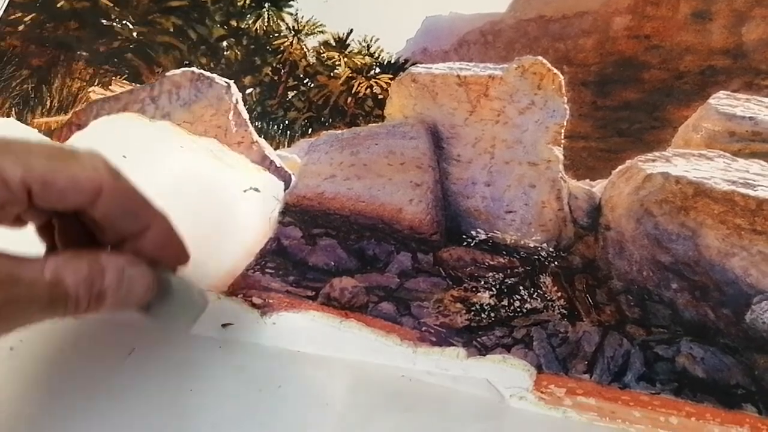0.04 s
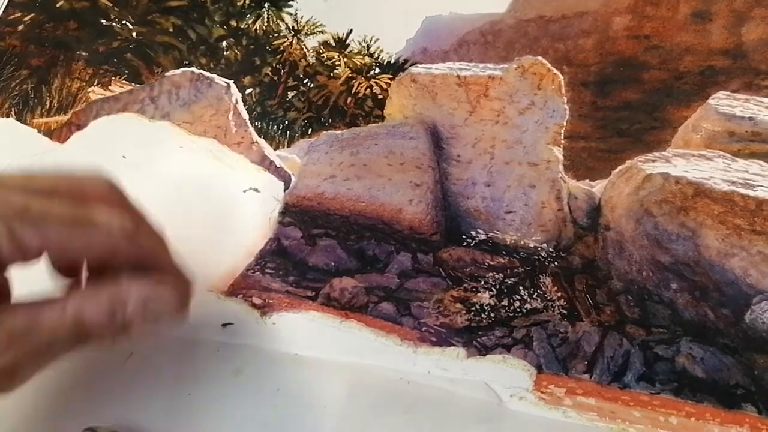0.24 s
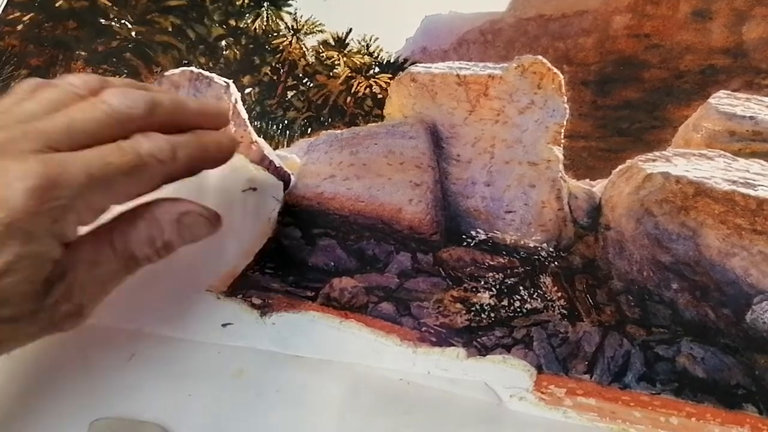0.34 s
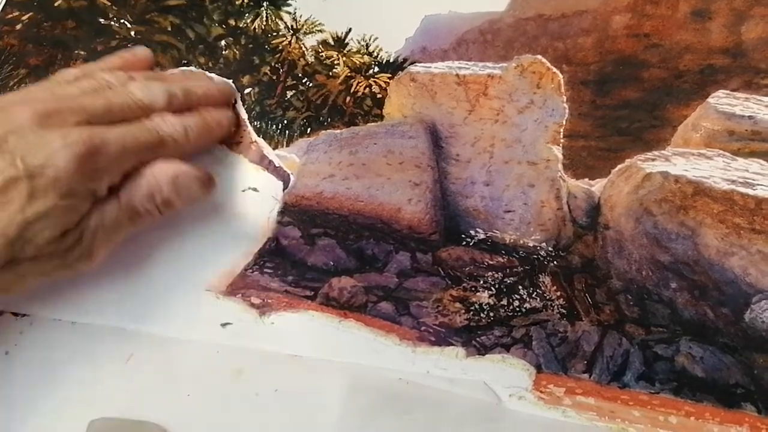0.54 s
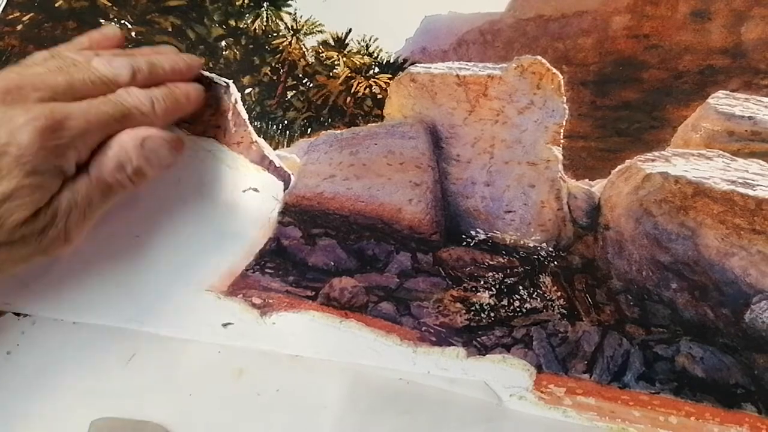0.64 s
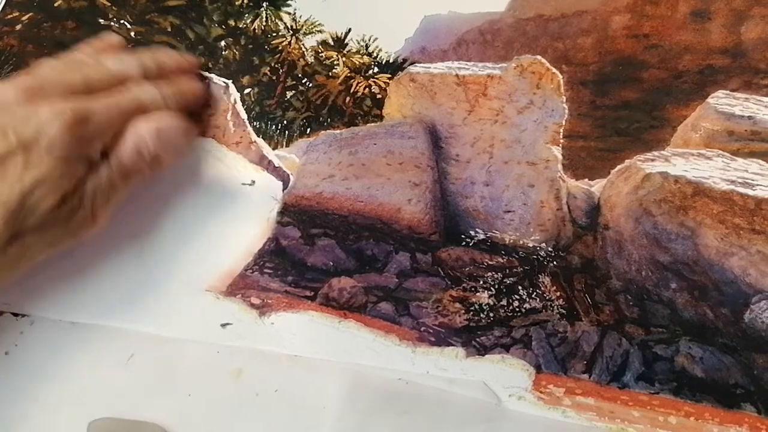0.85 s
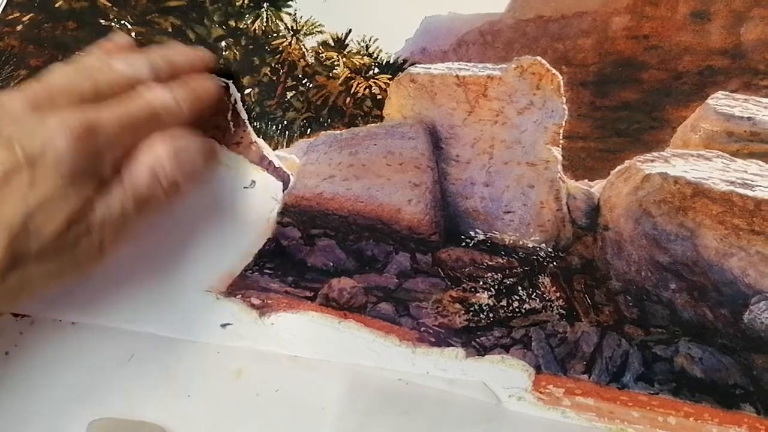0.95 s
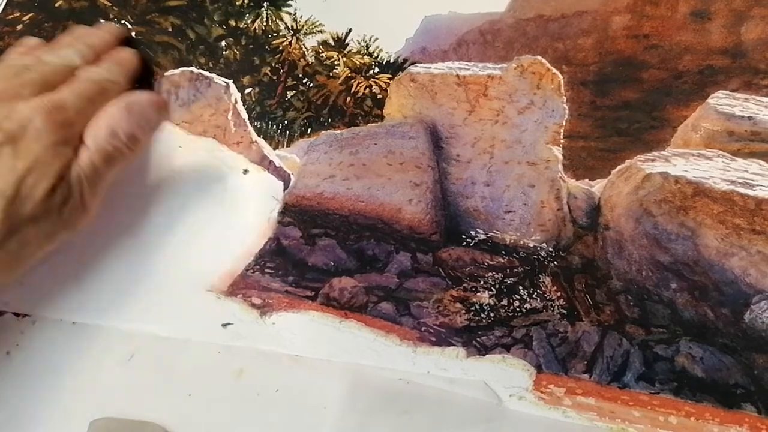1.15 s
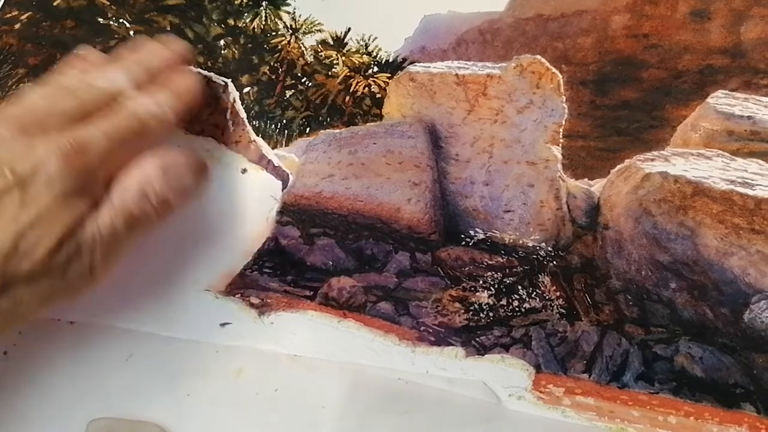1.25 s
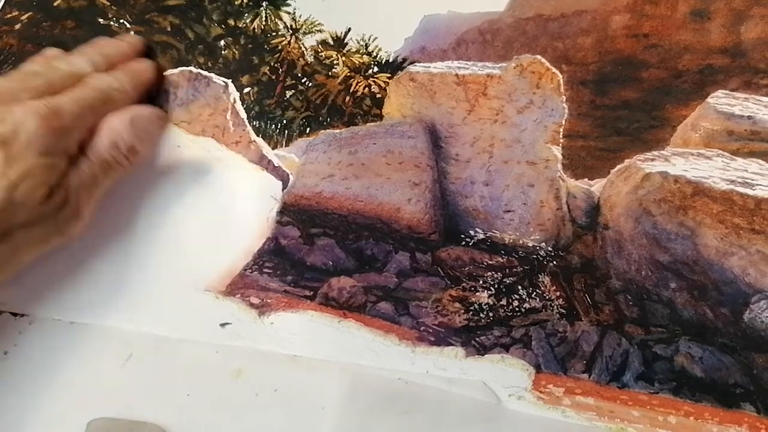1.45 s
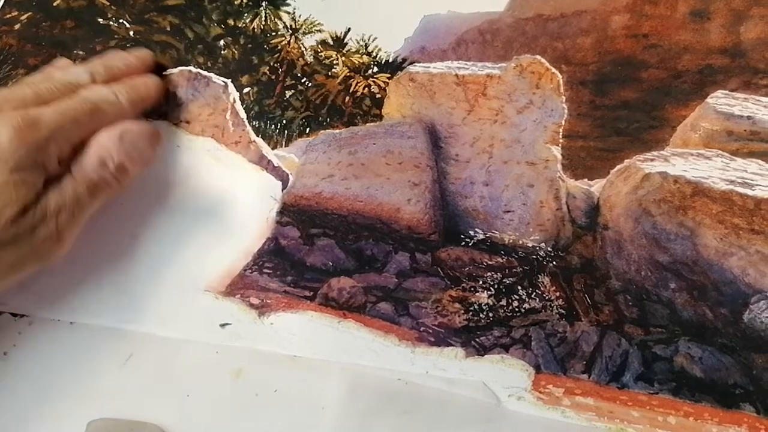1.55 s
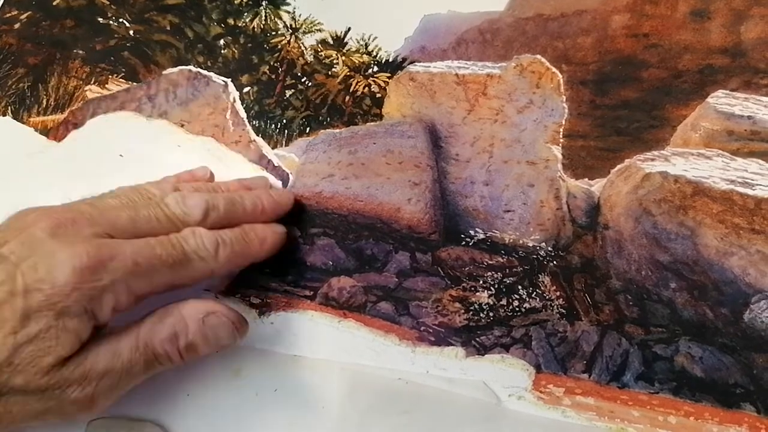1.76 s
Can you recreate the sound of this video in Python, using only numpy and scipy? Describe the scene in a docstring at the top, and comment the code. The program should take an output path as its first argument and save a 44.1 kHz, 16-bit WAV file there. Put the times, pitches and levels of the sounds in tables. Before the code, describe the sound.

Hand sweeping eraser crumbs off watercolour paper in four dry, airy strokes after an eraser clacks down

```python
"""The side of a hand sweeps crumbs off watercolour paper in four strokes, among lighter touches: dense
streams of tiny slips, coloured by the paper, with a hollow resonance under the hand. Before that an eraser
is set down on a drawing board: noise-burst knocks and clicks, ringing board modes, a scuff of filtered slips.
A sleeve rustles late, air stirs at the ports. A small quiet room, heard close up by two microphone ports."""
import sys
import numpy as np
from scipy import signal
from scipy.fft import rfft, irfft
from scipy.io import wavfile

SR = 44100
rng = np.random.default_rng(int(sys.argv[2]) if len(sys.argv) > 2 else 0)


def generate_wav(signal):
    """Clip the signal to [-1, 1] and save it as 16-bit WAV at the path in sys.argv[1]."""
    frames = np.transpose(np.atleast_2d(signal))
    scaled = np.clip(frames, -1, 1) * 32767
    pcm = np.round(scaled).astype(np.int16)
    wavfile.write(sys.argv[1], SR, pcm)


N = 79380

# knocks of the eraser on the board: (time [s], level [dB], thump re level [dB], click re level [dB])
KNOCK_EVENTS = [(0.2364, -0.5, 0.5, -17), (.2425, -6, -30, -21), (.2480, -6.5, -23, -1),
                (0.2935, -27, 11, -12), (0.3078, -10, 0.5, -5), (.3292, -21, -16, 6.5),
                (0.3398, -14.5, -25, -26), (0.3477, -9.5, 2, 8), (.3810, -21.5, -4, -10),
                (0.3856, -23, 3.5, 7), (0.463, -21.5, 8, -8)]
# spectrum of the eraser's edge clicking: (frequency [Hz], relative level [dB])
CLICK_SPECTRUM = [(300, -18), (550, -3), (760, 8.5), (1000, -4), (1500, -20), (3800, -8), (5400, 5.5),
                  (6800, -9), (9500, -14.5), (12000, -27), (15000, -38)]
PORT_LAG_S, EARLY_DB = 0.00013, 3


def undb(db):
    """Decibels to gain."""
    return 10 ** (np.asarray(db) / 20)


def clock():
    """Time of every sample [s]."""
    return np.arange(N) / SR


def unit(x):
    """Scale to rms 1."""
    return x / np.sqrt(np.mean(x ** 2))


def noise():
    """White noise over the whole scene."""
    return rng.standard_normal(N)


def impulse(start_s):
    """Single-sample push."""
    return 1. * (np.arange(N) == int(start_s * SR))


def fade(start_s, t60_s):
    """Exponential decay from start_s, zero before."""
    age_s = clock() - start_s
    return (age_s >= 0) * np.exp(-np.log(1000) * np.maximum(age_s, 0) / t60_s)


def burst(start_s, t60_s):
    """Decaying noise of unit energy."""
    x = noise() * fade(start_s, t60_s)
    return x / np.linalg.norm(x)


def ring(start_s, hz, t60_s):
    """One struck mode: a decaying sine."""
    return np.sin(2 * np.pi * hz * (clock() - start_s)) * fade(start_s, t60_s)


def curve(points):
    """Gain over time from (time [s], level [dB], ..) points, silent before the first."""
    s, db = np.array(points).T[:2]
    return undb(np.interp(clock(), s, db)) * (clock() >= s[0])


def gains(points, size):
    """Gain at each FFT bin, interpolated over log frequency from (frequency [Hz], level [dB]) points."""
    hz, db = np.array(points, float).T
    bin_hz = np.arange(size // 2 + 1) * SR / size
    return undb(np.interp(np.log(bin_hz + 1), np.log(hz), db))


def colour(x, points):
    """Minimum-phase filter of unit energy with the given spectrum."""
    size = 4096
    cepstrum = irfft(np.log(gains(points, size)))
    cepstrum[1:size // 2] *= 2  # fold the cepstrum to make the filter causal
    cepstrum[size // 2 + 1:] = 0
    h = irfft(np.exp(rfft(cepstrum)))
    return signal.fftconvolve(x, h / np.linalg.norm(h))[:N]


def lowpass(x, hz, order=2):
    """Butterworth low-pass."""
    return signal.sosfilt(signal.butter(order, min(hz, SR / 2 - 1), fs=SR, output="sos"), x)


def resonance(x, centre_hz, width_hz):
    """Band-pass with a movable centre, rms 1: shift down, low-pass, shift back."""
    carrier = np.exp(2j * np.pi * np.cumsum(centre_hz) / SR)
    baseband = lowpass(x / carrier, width_hz / 2)
    return unit((baseband * carrier).real)


def slips():
    """Tiny slips over the paper's tooth: random signed impulses, uneven in size, slightly wavering, rms 1."""
    slips_per_s, spread_db, waver_db, waver_hz = 30000, 5, -0.3, 119
    hit = rng.random(N) < slips_per_s / SR
    size = undb(spread_db * noise()) * np.sign(noise())
    waver = undb(waver_db * unit(lowpass(noise(), waver_hz)))
    return unit(hit * size * waver)


def hand():
    """Several patches of skin rub at once, each with its own path to the ports."""
    # sweeps of the hand: (start [s], landing time [s], fastest moment [s], half length [s],
    #                      level [dB], hollow under the hand re level [dB])
    strokes = [(.574, 0.0087, 0.6, .038, -37, -0.5), (.814, 0.015, .88, 0.046, -33, -4),
               (1.085, 0.0074, 1.1403, 0.054, -33.5, 0), (1.372, 0.033, 1.455, 0.068, -33.5, 3)]
    # light touches on the paper, same columns: (start [s], landing time [s], fastest moment [s],
    #                      half length [s], level [dB], hollow under the hand re level [dB])
    grazes = [(0.459, 0.0036, 0.466, 0.023, -54.5, -8), (0.784, 0.0032, .802, 0.06, -61, 4.5),
              (0.936, .01, 0.89, 0.066, -61, -8), (1.182, .01, 1.093, .025, -57, -10),
              (1.361, .006, 1.376, 0.024, -75, 13), (1.549, 0.005, 1.555, 0.017, -58, -1),
              (1.782, 0.0098, 1.8, .03, -66.5, 6.5)]
    patch_count, patch_lag_s = 4, .00003
    lags_s = PORT_LAG_S + patch_lag_s * np.linspace(-1, 1, patch_count)
    patches = [place(rub(strokes + grazes), lag_s, EARLY_DB) for lag_s in lags_s]
    return sum(patches) / np.sqrt(patch_count)


def rub(rows):
    """One patch of skin: hiss swells and brightens after touch; the hollow rises in pitch and fades."""
    # hiss of skin on paper: (frequency [Hz], relative level [dB])
    paper_spectrum = [(100, -48), (400, -21.5), (850, -21.5), (1400, -15.5), (2000, -8), (2900, -3.5),
                      (3600, -1), (4300, -1.5), (5400, 1.5), (7400, -3.5), (8300, -3), (9600, -4),
                      (11000, -5.5), (12400, -13.5), (15000, -20)]
    swell_shape = 2.93
    bright_hz, bright_rise_s, bright_start = 4460, 0.01, 0.5
    hollow_base_hz, hollow_width_hz, hollow_fade_s = 2646, 680, 0.056
    octave_s, rise_shape = 0.095, 3.84  # the hollow climbs one octave, then holds
    t = clock()
    hiss, air = colour(slips(), paper_spectrum), slips()
    dull = lowpass(hiss, bright_hz, order=1)
    body, ringing, brightness, weighted_hz = np.zeros((4, N))
    for start_s, landing_s, fastest_s, half_s, db, hollow_db in rows:
        age_s = np.maximum(t - start_s, 0)
        swell = np.exp(-np.abs((t - fastest_s) / half_s) ** swell_shape)
        contact = undb(db) * np.clip(age_s / landing_s, 0, 1) * swell
        body += contact
        brightness += contact * (1 - (1 - bright_start) * np.exp(-age_s / bright_rise_s))
        ringing += contact * undb(hollow_db) * np.exp(-age_s / hollow_fade_s)
        weighted_hz += contact * hollow_base_hz * 2 ** np.minimum((age_s / octave_s) ** rise_shape, 1)
    hollow_hz = np.maximum(weighted_hz / (body + 1e-12), hollow_base_hz)  # mean over contacts
    hollow = resonance(air, hollow_hz, hollow_width_hz)
    return body * dull + brightness * (hiss - dull) + ringing * hollow


def eraser():
    """Each knock is a dull clack and a click of the edge: decaying noise less an impulse, coloured."""
    # spectrum of the clack: (frequency [Hz], relative level [dB])
    clack_spectrum = [(100, -15), (400, -4), (550, -10.5), (780, -11.5), (1020, -9.5), (1500, -9),
                      (2000, 1), (2700, -5.5), (3600, -13), (6000, -15.5), (10000, -25.5), (15000, -52)]
    knock_db = -12.5
    clack_t60_s, clack_ring = 0.025, 1.22
    click_t60_s, click_ring = 0.014, 0.44
    clack, click = np.zeros((2, N))
    for start_s, db, _, click_db in KNOCK_EVENTS:
        clack += undb(db) * (clack_ring * burst(start_s, clack_t60_s) - impulse(start_s))
        click += undb(db + click_db) * (click_ring * burst(start_s, click_t60_s) - impulse(start_s))
    return undb(knock_db) * (colour(clack, clack_spectrum) + colour(click, CLICK_SPECTRUM))


def board():
    """The eraser's knocks and the landing hand excite the board's modes, which thump."""
    # modes of the board: (frequency [Hz], relative level [dB], t60 [s])
    modes = [(102.5, -27, 0.2), (139.2, -6.5, 0.44), (192, -6, 0.22), (238, 6.5, 0.081), (345, -3, 0.093),
             (381, -1, 0.099), (704, -30, 0.041), (804, -5, 0.12)]
    # the hand lands on the board: (time [s], level [dB])
    landings = [(.58, -65), (1.093, -61)]
    thump_base_db = -40.5
    blows = [(s, thump_base_db + db + thump_db) for s, db, thump_db, _ in KNOCK_EVENTS] + list(landings)
    force = sum(undb(db) * impulse(s) for s, db in blows)
    response = sum(undb(db) * ring(0, hz, t60_s) for hz, db, t60_s in modes)
    return -signal.fftconvolve(force, response)[:N]


def tick():
    """A tiny bright tick before the eraser lands: a short high ring and a coloured impulse."""
    start_s, hz, t60_s, ring_db, snap_db = .1485, 9400, .0025, -37.5, -53
    snap = colour(impulse(start_s), CLICK_SPECTRUM)
    return undb(ring_db) * ring(start_s, hz, t60_s) + undb(snap_db) * snap


def slide():
    """Rubber and fingers drag unevenly over paper and catch on crumbs, with a low wandering judder."""
    # spectrum of the drag and the crumbs: (frequency [Hz], relative level [dB])
    drag_spectrum = [(40, -6), (130, -1.5), (230, -12), (500, -5.5), (800, -7.5), (1300, -18), (1850, -7),
                     (2600, -7.5), (3700, -9.5), (4500, -22), (7000, -22.5), (10000, -20), (12500, -32),
                     (15000, -43)]
    # eraser and fingers sliding to rest: (time [s], level [dB])
    sliding = [(.24, -49), (.268, -56.5), (.30, -52.5), (.335, -49), (.365, -52), (.39, -53.5),
               (.43, -56.5), (.48, -52.5), (.55, -61.5), (.7, -60.5), (.78, -71), (.9, -100)]
    # judder of rubber, then of the returning hand, on the board: (time [s], level [dB], centre [Hz])
    judder_path = [(.245, -73, 212), (.272, -47.5, 150), (.33, -60, 136), (.385, -53, 194), (.43, -56, 225),
                   (.468, -58, 238), (.5, -66, 218), (.62, -82, 223), (.78, -67.5, 207), (.86, -98, 204),
                   (1.22, -98, 203), (1.34, -64, 209), (1.42, -83, 230)]
    judder_width_hz, catch_db, catch_hz = 85, 2.5, 58.6
    crumbs_per_s, crumbs_db, crumbs_spread_db = 120, -9.5, 5
    s, _, hz = np.array(judder_path).T
    judder = curve(judder_path) * resonance(slips(), np.interp(clock(), s, hz), judder_width_hz)
    catching = undb(catch_db * unit(lowpass(noise(), catch_hz)))
    crumbs = (rng.random(N) < crumbs_per_s / SR) * undb(crumbs_spread_db * noise())
    drag = unit(catching * colour(slips(), drag_spectrum))
    crackle = undb(crumbs_db) * unit(colour(crumbs, drag_spectrum))
    return curve(sliding) * (drag + crackle) + judder


def sleeve():
    """Soft rustle as the arm comes back: coloured slips under a level curve."""
    # spectrum of the cloth: (frequency [Hz], relative level [dB])
    cloth_spectrum = [(80, -4.5), (280, 2.5), (600, -1.5), (1300, -11.5), (3000, -15.5), (6200, -13.5),
                      (8000, -20.5), (9800, -10.5), (12000, -28.5), (15000, -40)]
    # the rustle: (time [s], level [dB])
    rustling = [(1.26, -100), (1.4, -62.5), (1.58, -61), (1.8, -67.5)]
    return curve(rustling) * colour(slips(), cloth_spectrum)


def draught():
    """The moving hand pushes air at the ports: low-passed noise, partly different at each."""
    # air at the ports: (time [s], level [dB])
    air_push = [(.2, -90), (.3, -61.5), (.5, -62), (.68, -68), (.83, -55), (.96, -85), (1.14, -56),
                (1.27, -73), (1.37, -62.5), (1.55, -86)]
    cutoff_hz, side_gain = 56.6, 0.4
    mid, side = (unit(lowpass(noise(), cutoff_hz, order=5)) for _ in range(2))
    return curve(air_push) * (mid + side_gain * np.array([side, -side]))


def room_tone():
    """Faint rumble and hiss: steady coloured noise, almost unrelated at the two ports."""
    # spectrum of the room: (frequency [Hz], relative level [dB])
    tone_spectrum = [(20, 2.5), (45, -8), (100, -12.5), (150, -17), (230, -13.5), (450, -19), (1050, -25),
                     (3000, -31), (8000, -38.5), (11000, -43), (15000, -52.5)]
    mid_db, side_gain = -67, 0.99
    mid, side = (unit(colour(noise(), tone_spectrum)) for _ in range(2))
    return undb(mid_db) * (mid + side_gain * np.array([side, -side]))


def place(x, lag_s, early_db, scatter_hz=500):
    """Sound reaches the ports lag_s apart; the desk scatters the treble, the room adds a short dull tail."""
    # left minus right at the ports: (frequency [Hz], level difference [dB])
    balance = [(60, 7.5), (200, 1.5), (600, 2.5), (1400, -1), (2000, -0.5), (2450, -1), (3000, 0.5),
               (5200, -.5), (7500, 7.5), (8300, -8.5), (9300, 12.5), (10800, -8), (12500, 5), (15000, -9)]
    early_t60_s, room_t60_s, room_delay_s = 0.035, 0.19, .008
    room_db, room_damp_hz = -11.5, 5050
    hz = np.arange(N + 1) * SR / (2 * N)
    ports = []
    for side in (1, -1):  # left, right
        early = burst(0, early_t60_s)
        scatter = early - lowpass(early, scatter_hz, order=1)
        tail = lowpass(burst(room_delay_s, room_t60_s), room_damp_hz, order=1)
        echoes = undb(early_db) * scatter + undb(room_db) * tail
        direct = np.exp(1j * np.pi * hz * lag_s * side)  # half the lag at each port
        path = direct + rfft(echoes, 2 * N)
        port_gain = gains(balance, 2 * N) ** (side / 2)
        ports.append(irfft(rfft(x, 2 * N) * path * port_gain)[:N])
    return np.array(ports) / np.sqrt(1 + undb(early_db) ** 2)


def scene():
    """The hand in front, the eraser to one side, over the room tone."""
    knocks = place(eraser() + board() + tick(), lag_s=-0.000069, early_db=-5)
    rubs = place(slide() + sleeve(), PORT_LAG_S, EARLY_DB)
    return hand() + knocks + rubs + draught() + room_tone()


def record(dry):
    """The recorder cuts the top with a steep elliptic low-pass."""
    top_hz = 15200
    return signal.sosfilt(signal.ellip(10, .1, 80, top_hz, fs=SR, output="sos"), dry)


dry = scene()
out = record(dry)
generate_wav(out)
```